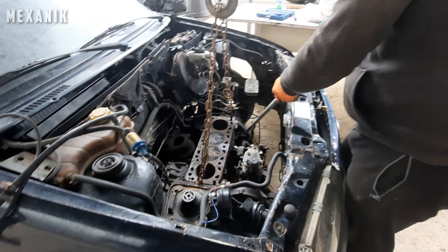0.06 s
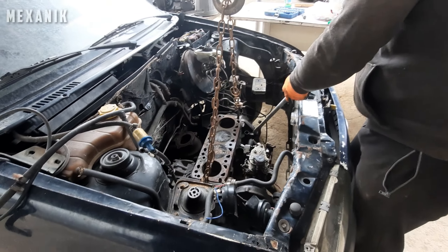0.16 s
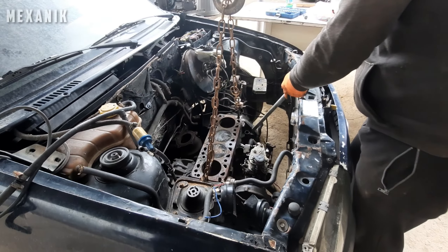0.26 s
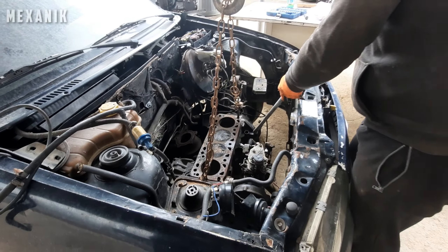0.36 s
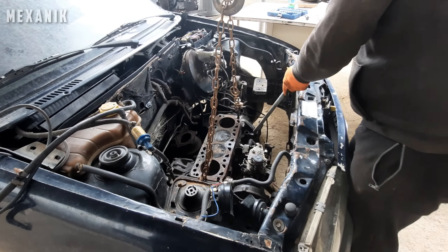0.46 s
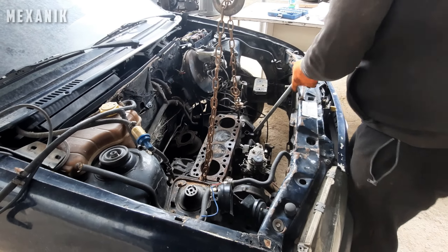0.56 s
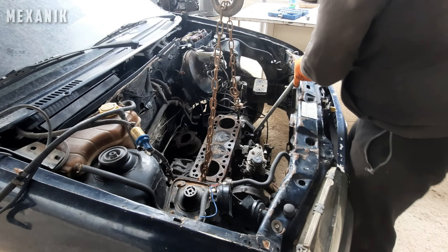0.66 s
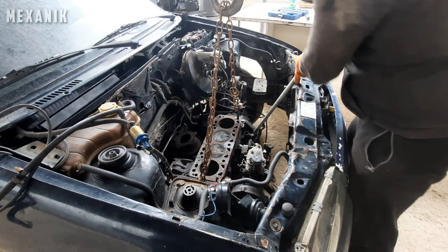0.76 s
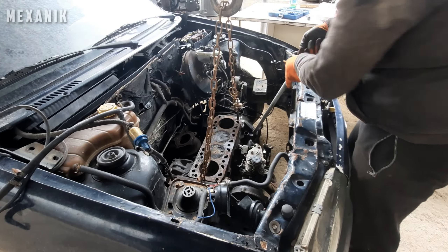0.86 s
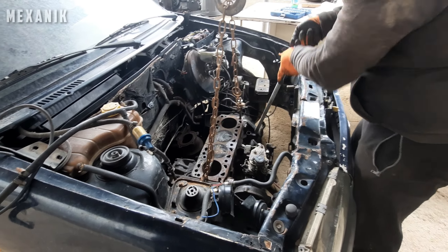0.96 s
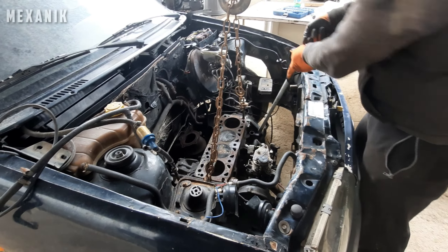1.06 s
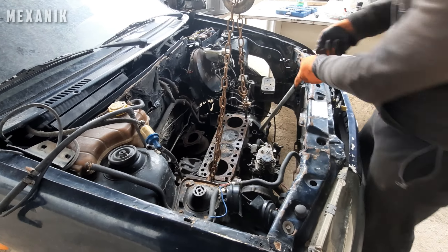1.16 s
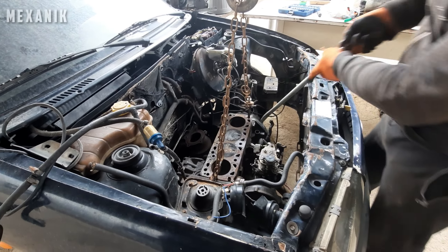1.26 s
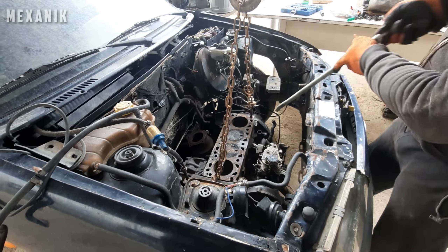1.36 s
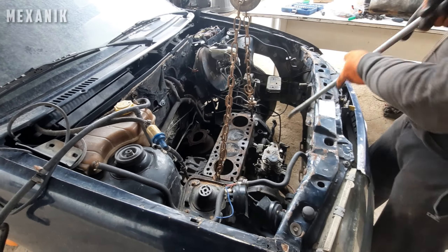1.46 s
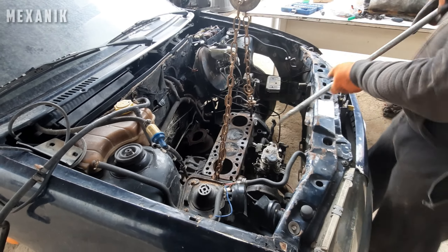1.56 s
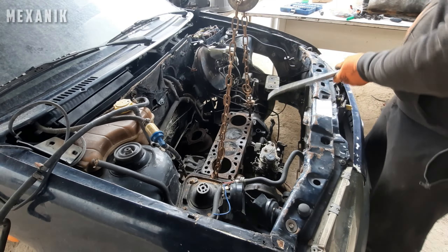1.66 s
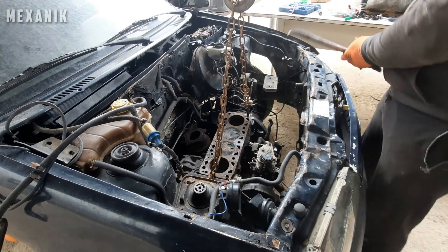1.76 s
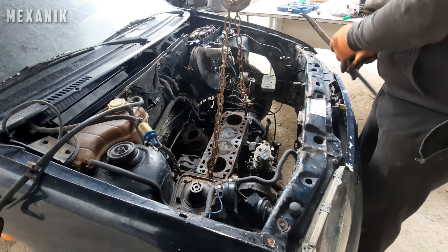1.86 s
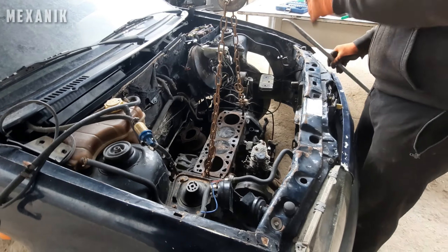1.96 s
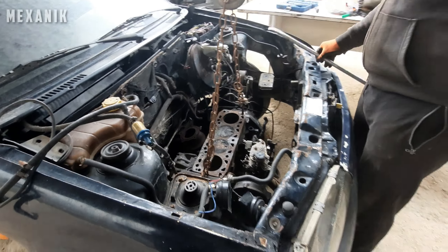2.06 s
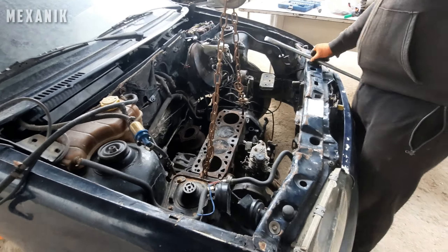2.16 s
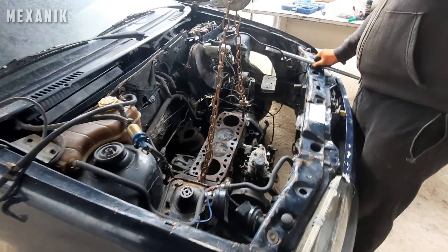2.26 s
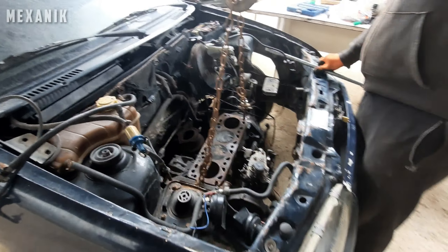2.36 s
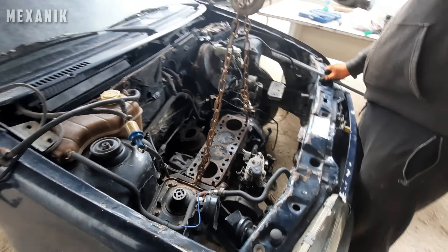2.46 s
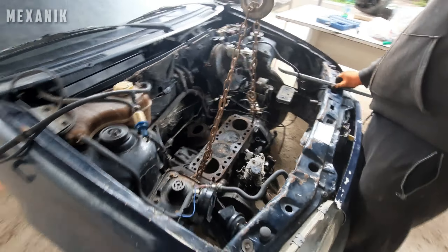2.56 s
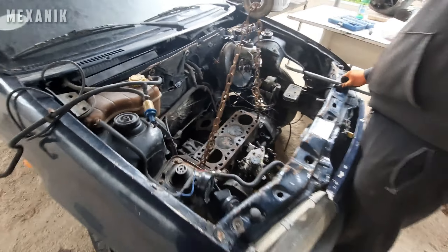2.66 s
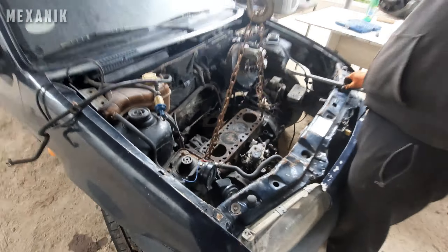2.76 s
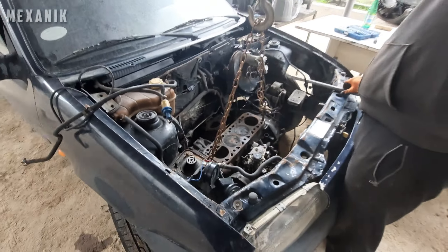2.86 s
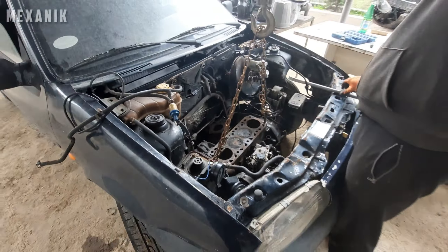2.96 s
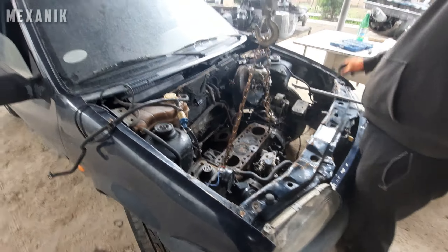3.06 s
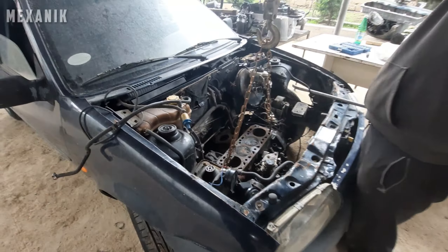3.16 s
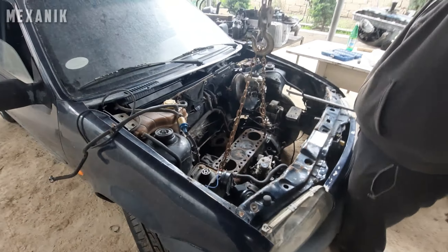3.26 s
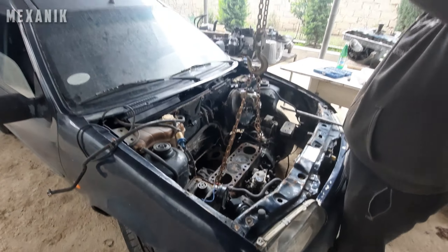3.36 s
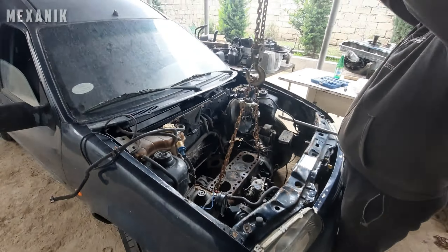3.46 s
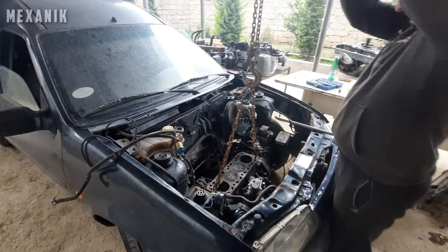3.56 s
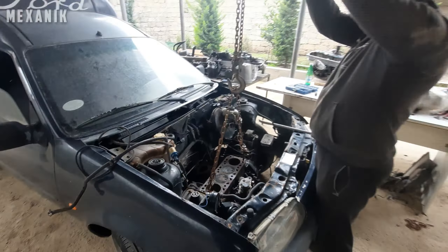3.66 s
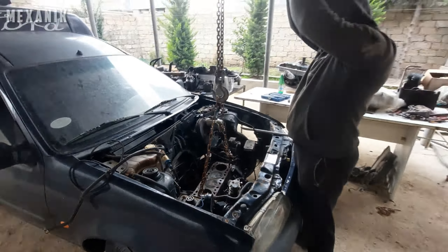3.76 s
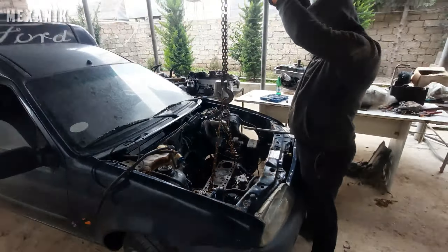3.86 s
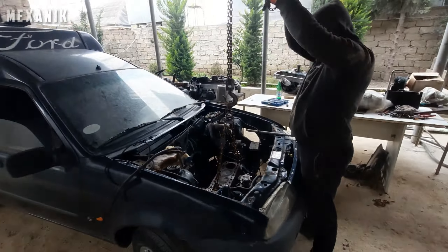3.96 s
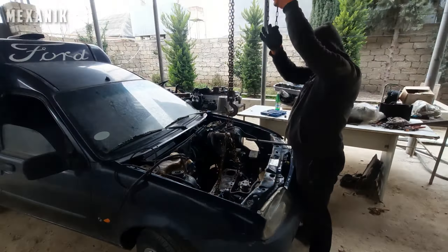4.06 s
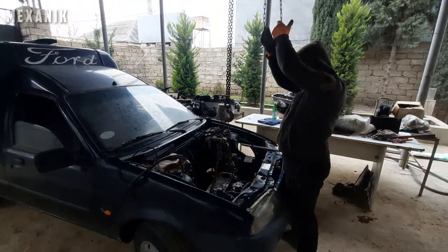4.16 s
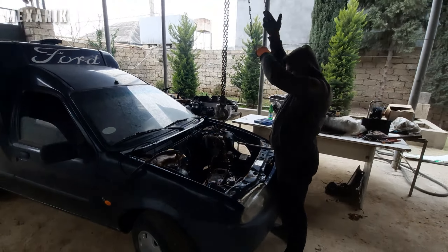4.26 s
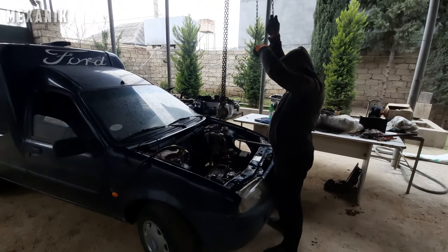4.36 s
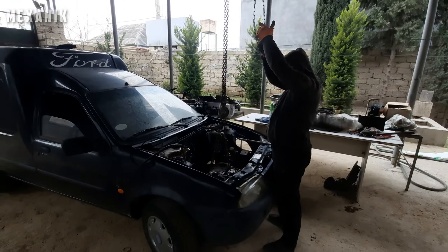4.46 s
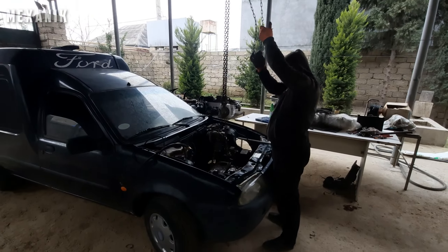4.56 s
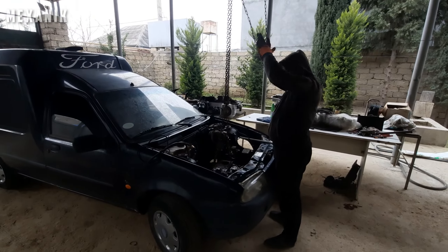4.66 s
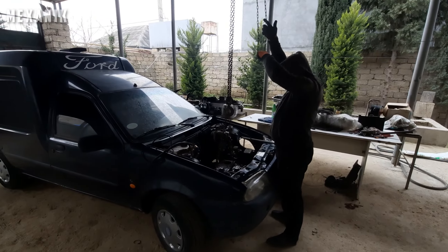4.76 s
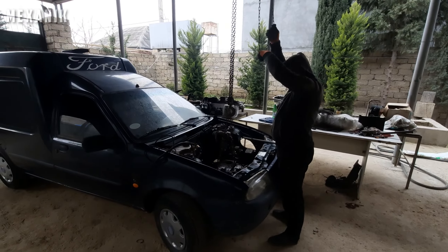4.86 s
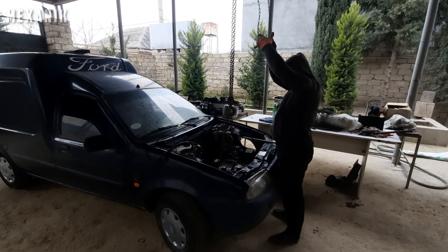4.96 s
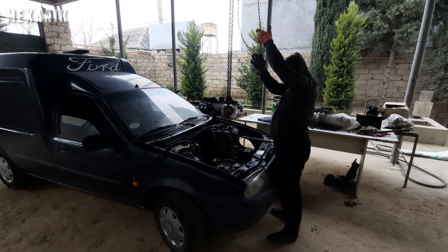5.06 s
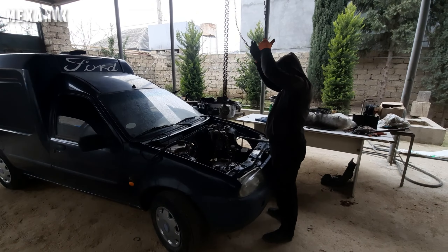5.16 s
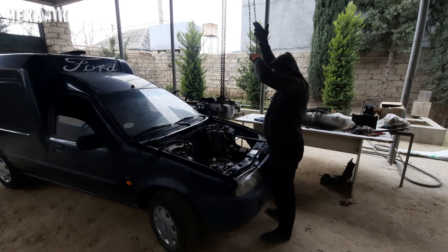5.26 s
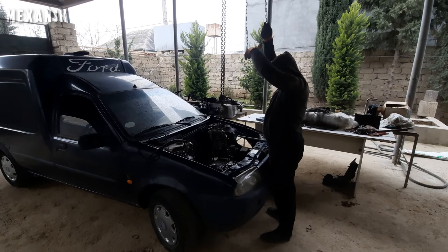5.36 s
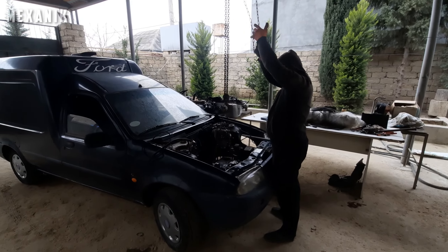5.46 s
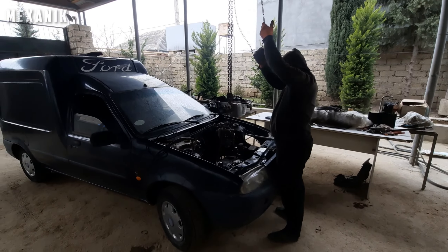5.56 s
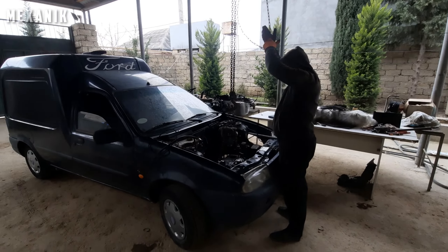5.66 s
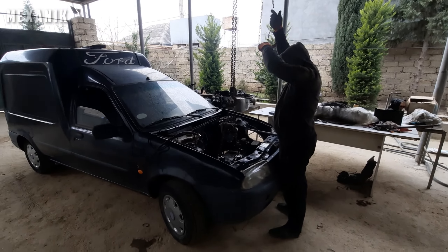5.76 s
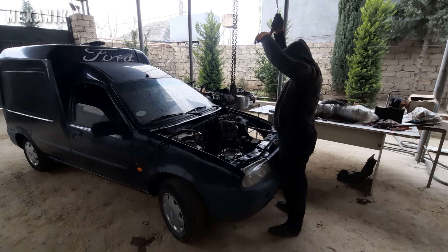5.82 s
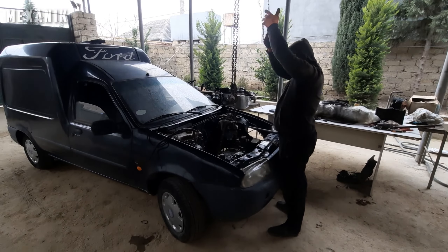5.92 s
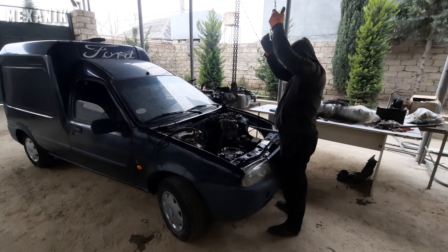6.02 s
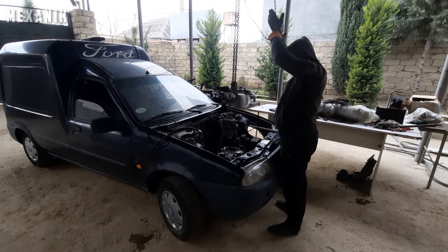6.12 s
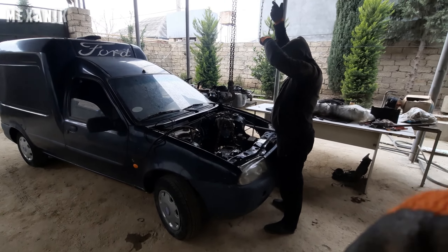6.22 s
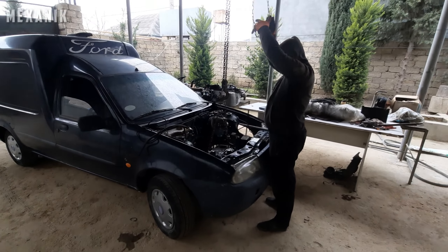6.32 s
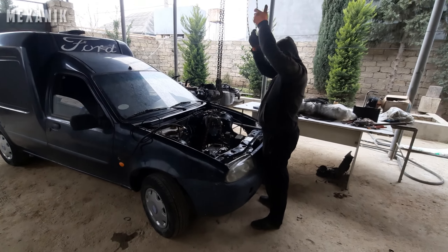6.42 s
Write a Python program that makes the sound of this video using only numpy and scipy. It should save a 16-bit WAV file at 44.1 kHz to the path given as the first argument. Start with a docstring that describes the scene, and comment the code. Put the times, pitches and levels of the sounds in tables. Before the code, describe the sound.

Close stereo sound in an open-sided shed, slightly stronger on the right, with short diffuse echoes. From 0 to 1.3 s a steel bar makes quiet, irregular taps and small tinkles on engine metal, gradually firmer and duller. At about 1.33 and 1.40 s two bright, hard catches start a gritty, singing scrape that fades by 1.6 s. A soft cloth-like swish passes near 1.85 s. From 2.04 s knocks return in a fast scrabble, loudest around 2.16, 2.46 and 2.68 s, dry and clanking, with hollow panel thuds and low boom continuing to about 3.2 s. From 3.0 s a chain hoist is hauled: rattling bursts every 0.2 to 0.3 s after 3.4 s, bright link clinks, wheel clatter, and a low pulsing roof-beam drone. A heavier low clank lands at 5.57 s. Pulling continues to the end, around 6.4 s, over faint air rumble.

```python
"""First a steel pry bar taps, scrapes and knocks, close by, in the engine bay of a van under an open shed roof.
Then a chain hoist is hauled hand over hand: links clink and rattle, and the roof beam that carries it drones.
Metal is made of damped sines, resonances struck by random contacts, and shaped noise; cloth and air are noise.
The microphone's right port is a little nearer to the work; the shed answers with short, diffuse echoes."""
import sys
import numpy as np
from scipy import signal
from scipy.fft import rfft, irfft, next_fast_len
from scipy.io import wavfile
from scipy.ndimage import map_coordinates

SR = 44100
rng = np.random.default_rng(int(sys.argv[2]) if len(sys.argv) > 2 else 0)


def master(y):
    """Save y as 16-bit WAV."""
    cut = np.clip(np.atleast_2d(y).T, -1, 1)
    pcm = np.round(cut * 32767)  # scale
    wavfile.write(sys.argv[1], SR, pcm.astype(np.int16))


def gain_from_db(level_db):
    """Turn a decibel level (scalar or array-like) into a linear amplitude factor."""
    decades = np.asarray(level_db, float) / 20
    return 10 ** decades


N = 286209
TIME = np.arange(N) / SR

# Steel blows in the engine bay, by the bar and later by the jerking chain. Each row: start in seconds,
# level in dB, strongest region in Hz, ring t60 in seconds, panel thud in dB, thud region in Hz.
BLOWS = [(0.04, -49, 2950, 0.049, -66.5, 650), (0.059, -54, 2570, 0.059, -71, 646),
         (.14, -62, 1400, 0.073, -74, 650), (0.239, -60, 2850, 0.033, -74, 283),
         (0.314, -45, 1840, 0.039, -65.5, 282), (0.484, -44.5, 2110, 0.058, -53.5, 560),
         (.51, -55, 1400, 0.1, -60.5, 556), (0.763, -40, 1390, 0.035, -47, 297),
         (0.88, -45, 815, 0.053, -46.5, 564), (0.933, -43, 2040, 0.043, -64, 540),
         (1.053, -36, 755, 0.034, -44.5, 332), (1.273, -39, 2100, 0.1, -59, 690),
         (1.33, -40, 3100, .1, -74, 573), (2.039, -53, 2500, 0.043, -56, 700),
         (2.0505, -32.5, 794, 0.035, -47.5, 800), (2.065, -36.5, 2750, 0.046, -48, 726),
         (2.077, -45, 3000, 0.023, -59, 740), (2.104, -44, 800, .03, -54, 740),
         (2.115, -49, 2800, .025, -55, 700), (2.1345, -34, 2200, 0.02, -46, 630),
         (2.149, -45, 2600, 0.042, -64, 690), (2.162, -22.5, 1620, 0.02, -54, 584),
         (2.1645, -25, 2680, 0.015, -55, 580), (2.18, -40, 3200, 0.013, -57, 573),
         (2.204, -49, 2620, 0.033, -60, 557), (2.362, -36.5, 721, 0.06, -51.5, 695),
         (2.4575, -17.5, 1650, 0.055, -36, 237), (2.463, -18.5, 1140, 0.048, -39, 640),
         (2.473, -32, 780, 0.061, -39.5, 640), (2.554, -47.5, 2700, 0.15, -49, 250),
         (2.584, -36, 1450, 0.057, -43, 660), (2.601, -25, 1170, 0.042, -39, 664),
         (2.6766, -21, 1300, 0.047, -47, 657), (2.682, -25, 1630, 0.03, -48, 657),
         (2.782, -34.5, 715, 0.037, -52.5, 280), (2.827, -51, 1680, .03, -59, 460),
         (2.8395, -30, 1200, 0.045, -53, 460), (2.845, -36, 1490, 0.029, -55, 460),
         (2.91, -40.5, 1500, 0.053, -51, 584), (2.973, -32.5, 1240, 0.067, -49, 212),
         (3.076, -32, 1500, 0.085, -34.5, 219), (3.1525, -33, 1250, 0.081, -50, 600),
         (3.366, -49, 2800, 0.074, -62, 600), (3.397, -37, 2600, 0.028, -56, 151),
         (3.4274, -46, 1820, 0.027, -63, 600), (3.447, -41, 2000, 0.12, -52, 204.5),
         (3.729, -36, 2600, 0.045, -54, 600), (4.085, -38.5, 744, 0.11, -36, 282),
         (5.567, -23.5, 720, 0.07, -28.5, 268), (5.585, -29.5, 740, 0.14, -39, 650),
         (5.625, -42, 746, 0.15, -34.5, 303)]
# Bar and struck metal. Each row: mode in Hz, relative level in dB, share of the blow's ring time (a ratio).
BAR_MODES = [(743, 4.5, 1.07), (850, -7, 0.14), (1138, 2, 1.26), (1427, -2, 1.6), (1562, -4.5, 0.92),
             (1750, 7, 0.63), (2090, 4, 0.76), (2400, -5, 0.44), (2690, -3.5, 0.96), (2904, 5.5, 0.78),
             (3270, 1, 0.57), (3680, -2, 1.2), (4210, 4.5, 0.71), (5230, -7, 0.87), (6500, 3.5, 0.3)]
# Panels of the van. Each row: mode in Hz, t60 in seconds for a blow that rings for PANEL_RING_S.
PANEL_MODES = [(190, 0.27), (220, 1), (270, 0.56), (300, 0.55), (355, 0.19), (415, 0.12), (500, 0.35),
               (570, 0.38), (640, 0.34), (690, 0.14), (750, 0.067)]
PANEL_RING_S = 0.074  # for other blows the panels ring in proportion
CLANK_DB, CLANK_DB_PER_OCTAVE = -7.5, 0.5  # clank against a 1 kHz blow; its rise with the blow's region
# Bright snaps of hard edge on hard edge. Each row: start in seconds, level in dB, t60 in seconds.
SNAPS = [(.0403, -60.5, .06), (.4035, -67, .06), (.484, -67, .04), (.7642, -65, .06), (0.854, -52, 0.041),
         (.933, -69, 0.027), (.9662, -61, 0.047), (1.0201, -66, .04), (1.274, -55, .06), (1.3292, -26, .03),
         (1.3978, -23.5, .03), (2.0615, -58, .05), (2.1475, -67, .04), (2.163, -65, .04),
         (2.4579, -40, 0.043), (2.584, -62, .04), (2.602, -58, .04), (2.6757, -51.5, 0.046),
         (2.9138, -57, .05)]
# The bar chattering over edges between its blows. Each row: time in seconds, level in dB.
CHATTER = [(2.02, -66), (2.06, -48.5), (2.12, -53.5), (2.17, -41.5), (2.23, -72), (2.44, -68), (2.47, -49),
           (2.56, -64), (2.61, -50), (2.67, -63), (2.69, -61), (2.76, -60), (2.9, -68), (2.93, -45),
           (2.99, -69)]
# Small tinkling taps on thin, light metal, then two hard catches of the scraping bar (the last two rows).
# Each row: start in seconds, level in dB, strongest region in Hz.
TINKLES = [(0.039, -59, 10000), (.113, -70, 2600), (0.12, -58, 4100), (0.139, -63.5, 6300),
           (.203, -61, 5870), (0.238, -61.5, 3500), (0.313, -70, 5900), (.404, -63, 5900),
           (0.469, -58, 4200), (0.483, -64, 6000), (1.247, -61, 8100), (1.329, -34, 8500),
           (1.398, -33.5, 10400)]
# The small tinkling metal. Each row: mode in Hz, relative level in dB, t60 in seconds.
TINKLE_MODES = [(2600, 7, 0.06), (4120, 0, 0.048), (5910, 5.5, .045), (6500, 0, 0.043), (8200, 2.5, .05),
                (8460, -4, 0.066), (9500, 0, 0.042), (10480, 2, 0.059), (12800, -6, .04)]
# The bar drawn along metal. Each row: time in seconds, relative level in dB.
SCRAPE_LEVEL = [(1.265, -63), (1.273, -44.5), (1.323, -51.5), (1.33, -36), (1.365, -38), (1.393, -43.5),
                (1.397, -36.5), (1.42, -40.5), (1.485, -44), (1.53, -55), (1.6, -76)]
# Steel singing under the scrape. Each row: mode in Hz, width in Hz, relative level in dB.
SINGING_MODES = [(575, 30, -1), (1893, 22, 6), (2592, 24, 5), (2893, 54, 1), (3640, 33, 4), (4140, 29, 0.5),
                 (5363, 12, 19), (5980, 20, 4), (6536, 16, 10), (7030, 20, 2), (7630, 25, 2), (8127, 20, 7),
                 (8504, 24, 2), (8840, 40, 0), (9830, 55, 1), (10480, 28, 5), (11660, 22, 3)]
# Hiss of grit under the bar. Each row: frequency in Hz, relative level in dB per Hz.
GRIT_SPECTRUM = [(240, -31), (400, -12.5), (569, -4.5), (958, -19), (2640, -7), (3320, -4.5), (5330, -8.5),
                 (15600, -12.5)]

# Hand-over-hand pulls. Each row: grip in seconds, time to full speed in seconds (at least 0.005 is used),
# time at full speed in seconds, then relative levels of link rattle, low and higher beam modes in dB.
PULLS = [(3.003, 0.085, 0.022, -34.5, -37, -37), (3.447, 0.081, 0.099, -36, -35, -37.5),
         (3.753, 0.0039, 0.12, -38, -36, -39), (3.976, .11, 0.028, -34, -34, -35.5),
         (4.203, 0.034, 0.085, -35, -39, -42), (4.438, 0.052, 0.11, -36, -32.5, -36.5),
         (4.658, 0.047, 0.038, -35.5, -33.5, -40), (4.844, 0.005, 0.0094, -41.5, -49.5, -49.5),
         (4.981, 0.096, 0.033, -34.5, -35, -39.5), (5.204, 0.069, 0.052, -36, -34, -37.5),
         (5.421, 0.1, 0.034, -35.5, -33, -36), (5.658, 0.05, 0.078, -34.5, -37.5, -36.5),
         (5.872, 0.11, 0.047, -37, -37, -34.5), (6.132, 0.034, 0.075, -35.5, -33, -34.5),
         (6.339, 0.036, 0.098, -36.5, -35, -35.5)]
START_DB, COAST_DB_PER_S = -8.5, 192  # links start at once below full level, and fade as the chain coasts
WHEEL_DB, WHEEL_START_DB, WHEEL_COAST_DB_PER_S = -5.5, -10, 137  # the wheel against the links
BEAM_LAG_S, BEAM_START_DB, BEAM_FADE_DB_PER_S = .03, -7, 87.5  # the roof answers late and fades slowly
UPPER_DB, SHEETING_DB, SHEETING_FADE_DB_PER_S = -3, -6, 46  # against the beam drone
FLUTTER_DB, FLUTTER_PER_S = 1.5, 70  # links arrive in uneven clumps
# Single loud links. Each row: start in seconds, then tick, high and low link modes in dB before a fixed offset.
CLINKS = [(3.0857, -33, -34, -46), (3.568, -38, -39, -31), (3.604, -28, -42, -31), (3.62, -35, -32.5, -55),
          (3.658, -32, -33.5, -57), (3.762, -37, -50, -35.5), (3.807, -40, -50, -52),
          (3.8938, -40, -48, -60), (4.0397, -38, -45, -37), (4.095, -33, -36.5, -42),
          (4.115, -38, -35.5, -48), (4.1328, -38, -50, -37), (4.23, -30.5, -43, -52.5),
          (4.2455, -36, -50, -33.5), (4.3014, -40, -53, -41), (4.445, -39, -49, -46.5),
          (4.5453, -38, -41, -43), (4.6, -25, -29, -41), (4.707, -37, -33, -59), (4.938, -20.5, -55, -52),
          (5.0083, -32, -47, -46), (5.0619, -35, -31, -53.5), (5.0923, -29, -31, -46),
          (5.1109, -36, -48, -36), (5.2806, -38, -40, -52), (5.444, -32, -53, -36), (5.5133, -30, -37, -40),
          (5.5401, -38, -40, -52), (5.565, -36, -36.5, -57), (5.689, -36, -43, -40),
          (5.7396, -36, -43, -35), (5.8743, -40, -40.5, -40), (5.9502, -29, -27, -57),
          (5.995, -38.5, -38, -35), (6.1367, -37, -48, -32.5), (6.161, -36, -43.5, -49),
          (6.1726, -34, -55, -38), (6.2016, -38.5, -50, -33.5), (6.2534, -40, -55, -50),
          (6.339, -36, -46, -36.5), (6.412, -26, -22, -47), (6.4575, -34.5, -42, -44)]
# Clink of each grip against the pull's rattle: one row of tick, high and low link modes in dB.
GRIP_DB = [-3, -12, -13]
# Link resonances, high and low. Each row: mode in Hz, width in Hz, relative level in dB.
LINK_HIGH_MODES = [(9250, 54, -9.5), (10125, 70, 4.5), (10213, 78, 7), (10224, 84, 0), (10590, 270, -7),
                   (12400, 36, -13.5)]
LINK_LOW_MODES = [(4654, 94, 3.5), (4785, 91, -0.5), (4900, 23, 8.5), (5050, 72, 1), (5280, 55, -7),
                  (6330, 93, -7), (8050, 74, -6.5)]
# Broad hiss of many small link contacts. Each row: frequency in Hz, relative level in dB per Hz.
RATTLE_SPECTRUM = [(1470, -28), (2500, -4), (3240, -3), (4130, -9), (4830, -2), (5720, -6.5), (6270, -6.5),
                   (7590, -10), (10400, -6), (15600, -7)]
# Hand wheel and housing. Each row: mode in Hz, width in Hz, relative level in dB.
WHEEL_MODES = [(1240, 67, -13), (1463, 22, 15), (1710, 80, -23), (2108, 58, 9), (2816, 26, 9),
               (3250, 410, 6)]
# Broad clatter of the wheel. Each row: frequency in Hz, relative level in dB per Hz.
CLATTER_SPECTRUM = [(410, -16.5), (700, -10), (1170, -15), (1530, -12.5), (3240, -18.5), (4000, -25),
                    (5200, -62), (8800, -120)]
# Knocks of the hoist's ratchet pawl in the wheel housing. Each row: start in seconds, relative level in dB.
KNOCKS = [(3.5795, -35), (3.7595, -34), (3.785, -40.5), (4.243, -34), (4.47, -37), (4.6954, -49),
          (4.7473, -34.5), (4.8486, -36), (5.257, -38.5), (5.4241, -41), (5.4955, -40), (5.6865, -38.5),
          (5.871, -37.5), (6.133, -37), (6.1652, -33), (6.3352, -29)]
# What a knock on the wheel rings. Each row: mode in Hz, width in Hz, relative level in dB.
HOUSING_MODES = [(1545, 130, 18), (1810, 180, 7.5), (2100, 86, 11), (1880, 1400, 6.5)]
# Roof beam, two lowest modes and then three more. Each row: mode in Hz, width in Hz, level within its group in dB.
BEAM_MODES = [(192.4, 26.5, -11.5), (229.3, 15.3, 3), (263.4, 14.5, 3.5), (297, 31, -13), (339.7, 21.5, -8)]
# Upper beam modes. Each row: mode in Hz, width in Hz, relative level in dB.
BEAM_UPPER_MODES = [(420, 60, -4), (517, 26.3, 5.5), (594.5, 25.3, 0), (660, 20, -5.5), (730, 33, -18.5)]
# Roof sheeting. Each row: mode in Hz, width in Hz, relative level in dB.
SHEETING_MODES = [(120, 18.7, -7), (140, 36.3, 0.5), (154.8, 65.6, -3)]
RECEDE_DB_PER_S = 3.5  # the sheeting rumble thins as the microphone backs away
BEAM_SHIFT_DB_PER_S = 1  # as the microphone moves, the two lowest beam modes lose this, the next three gain it

# Low panel boom around the blows, with shuffling and rubbing in the middle range.
# Each row: time in seconds, bass level in dB, middle level in dB.
SHUFFLE_LEVEL = [(0.0, -71.5, -71.5), (0.34, -77.5, -73.5), (0.81, -62.5, -62), (0.95, -58, -65),
                 (1.27, -59.5, -61), (1.38, -62, -51.5), (1.55, -70.5, -67.5), (1.86, -69.5, -65.5),
                 (2.11, -68, -67.5), (2.25, -63, -69.5), (2.44, -57, -55.5), (2.56, -47.5, -58),
                 (2.63, -43.5, -63), (2.88, -53, -62.5), (3.05, -50, -60), (3.18, -41, -50.5),
                 (3.3, -57, -69), (3.45, -63, -57)]
# Colours of the boom, the shuffling and the hush. Each row: frequency in Hz, relative level in dB per Hz.
LOW_SPECTRUM = [(24, -65), (40, -47), (113, -2), (196, -5.5), (355, -9.5), (531, -19.5), (560, -3.5),
                (1000, -28.5), (1300, -33), (2200, -120)]
MIDDLE_SPECTRUM = [(470, -14), (800, -0.5), (1040, -2.5), (1330, -1.5), (3880, -11), (5000, -21),
                   (6500, -32), (11000, -120)]
HISS_SPECTRUM = [(2350, -26), (4000, 0.5), (5230, -3.5), (9720, -8.5), (14700, -6), (15400, 1.5)]
# Airy swishes, probably cloth. Each row: middle in seconds, half length in seconds, level in dB,
# top treble against the rest in dB.
SWISHES = [(0.057, 0.077, -65, 2), (0.446, 0.039, -76, 2), (0.67, 0.13, -71.5, 1.5),
           (0.774, .02, -63.5, .5), (1.006, 0.069, -75, .5), (1.195, 0.066, -74, 1),
           (1.846, 0.061, -58.5, 0.5), (2.078, 0.06, -59, -8.5), (2.449, 0.086, -47.5, -11),
           (2.596, .05, -67, -5), (2.94, 0.032, -53.5, -7), (3.402, 0.056, -59.5, -0.5)]
TOP_TREBLE_HZ = 9500
HUSH_DB, SWISH_EDGE_DB = -80.5, 14.5  # treble between swishes; how far a swish has sunk at its half length
# Air on the microphone ports. Each row: time in seconds, level in dB.
AIR_LEVEL = [(0.0, -99), (0.05, -109), (1.37, -71), (1.76, -110), (2.55, -78), (3.49, -81), (3.78, -80),
             (4.15, -71), (6.4, -67)]
# Colour of that air. Each row: frequency in Hz, relative level in dB per Hz.
BREEZE_SPECTRUM = [(15, -6), (30, -17), (60, 12), (110, 12), (200, -46), (400, -120)]
# Decay of the shed's echoes. Each row: frequency in Hz, t60 in seconds.
SHED_T60 = [(200, 0.12), (1000, 0.36), (4000, 0.15), (12000, 0.24)]
# Strength of the echoes. Each row: frequency in Hz, echo level in dB.
ECHO_LEVEL = [(200, -13), (600, -11), (1500, -3), (5000, -2), (14000, 0)]
# Left port against right. Each row: frequency in Hz, level difference in dB.
LEFT_LEVEL = [(100, 0), (300, -1.5), (1000, -2.5), (2000, -1), (4500, -3), (8000, -3.5), (13000, -1.5)]
LEFT_LAG_S = 4 / SR


def pry_bar():
    """Each blow rings the modes near its strongest region, clanks broadly, thuds in the panels; hard edges snap."""
    out, t = np.zeros((2, N + SR)), np.arange(6400) / SR
    bar_hz, bar_db, share = np.transpose(BAR_MODES)[..., None]
    panel_hz, panel_t60 = np.transpose(PANEL_MODES)[..., None]
    for s, db, hz, t60, thud_db, thud_hz in BLOWS:
        contact = 3 / hz  # a duller blow is a softer, longer contact
        bar_level = db + bar_db - 7 - 14 * np.abs(np.log2(bar_hz / hz))
        ring = ringing(bar_hz, t60 * share, bar_level, t, attack=contact, vary_db=2.5)
        # a hard snap, then a slower tail
        dying = gain_from_db(8.0 - 60 * t / (0.27 * t60)) + gain_from_db(-7.5 - 60 * t / (1.26 * t60))
        clank = gain_from_db(db + CLANK_DB + CLANK_DB_PER_OCTAVE * np.log2(hz / 1e3)) * dying
        clank = clank * (1 - np.exp(-t / contact)) * body(hz, low_db=10.0, high_db=13.0, size=len(t))
        panel_level = thud_db - 0.5 - 22 * np.abs(np.log2(panel_hz / thud_hz))
        panel_ring_s = panel_t60 * t60 / PANEL_RING_S
        thud = ringing(panel_hz, panel_ring_s, panel_level, t, attack=0.0089, vary_db=3.5)
        boom = gain_from_db(thud_db - 1.5 - 60 * t / 0.32) * (1 - np.exp(-t / 0.0014))
        boom = boom * body(thud_hz, low_db=24.5, high_db=12.0, size=len(t))[0]
        out[:, round(s * SR):][:, :len(t)] += ring + clank + thud + boom
    for s, db, t60 in SNAPS:
        snap = gain_from_db(db - 60 * t / t60) * body(11500, low_db=2.5, high_db=-0.5, size=len(t))
        out[:, round(s * SR):][:, :len(t)] += snap
    chatter, = gains(CHATTER)
    return out[:, :N] + jingle(chatter, 260, low_hz=1320, high_hz=4390, cycles=35)


def tinkles():
    """Each tap or catch rings the small light metal near its strongest region, with a tiny click."""
    out, t = np.zeros(N + SR), np.arange(6400) / SR
    hz, mode_db, t60 = np.transpose(TINKLE_MODES)[..., None]
    for s, db, best_hz in TINKLES:
        octaves = np.log2(hz / best_hz)
        level_db = db + mode_db - np.maximum(24 * octaves, -5 * octaves)  # steeper above than below
        ring = ringing(hz, t60, level_db, t, attack=0.0014, vary_db=4)
        click = gain_from_db(db - 0.5 - 60 * t / 0.028) * body(best_hz, low_db=7, high_db=14, size=len(t))[0]
        out[round(s * SR):][:len(t)] += ring + click
    return out[:N]


def scrape():
    """Grit under the sliding bar hisses, and the steel sings on after each catch."""
    stroke, = gains(SCRAPE_LEVEL)
    catches = stroke * unit(contacts(2500, spread_db=1.5, alike=0.85))
    sing = filtered(catches, modes(SINGING_MODES))
    pings = jingle(stroke, 900, low_hz=1820, high_hz=15150, cycles=220)
    grit = stroke * coloured(contacts(1200, spread_db=3.5, alike=0.75), GRIT_SPECTRUM)
    return gain_from_db(9.5) * sing + gain_from_db(-2.0) * pings + gain_from_db(-2.0) * grit


def chain():
    """The pulls drive running links and the hand wheel, on fluttering levels, and shake the roof."""
    rattle = flutter() * pulled(START_DB, COAST_DB_PER_S, lag_s=0, column=3)
    clatter = gain_from_db(WHEEL_DB) * flutter() * pulled(WHEEL_START_DB, WHEEL_COAST_DB_PER_S, lag_s=0, column=3)
    return running_links(rattle, clatter) + hand_wheel(clatter) + roof() + clinks()


def running_links(rattle, clatter):
    """A dense rattle of small contacts that rings the link modes, with a crowd of separate pings."""
    hiss = coloured(contacts(1100, spread_db=3.0, alike=0.42), RATTLE_SPECTRUM)
    high = unit(filtered(contacts(200, spread_db=4.5, alike=0.091), modes(LINK_HIGH_MODES)))
    low = unit(filtered(contacts(150, spread_db=7.5, alike=0.49), modes(LINK_LOW_MODES)))
    links = rattle * (gain_from_db(-2.5) * hiss + gain_from_db(-13.0) * high + gain_from_db(-14.5) * low)
    links += gain_from_db(-9.0) * jingle(rattle, 850, low_hz=3007, high_hz=15060, cycles=530)
    return links + gain_from_db(-4.0) * jingle(clatter, 400, low_hz=890, high_hz=3520, cycles=21)


def clinks():
    """Loud links, and one at each grip: a bright tick and noise bursts that excite high and low link modes."""
    touches, t = np.zeros((3, 2, N + SR)), np.arange(200) / SR
    grips = [(s, *np.add(GRIP_DB, rattle_db)) for s, _, _, rattle_db, *_ in PULLS]
    for s, *levels_db in CLINKS + grips:
        # one short noise burst each for tick, high and low modes, starting together, partly alike at both ports
        shared, own = rng.standard_normal((3, 1, len(t))), rng.standard_normal((3, 2, len(t)))
        touch = unit(gain_from_db(-60 * t / 0.022) * (shared + 0.62 * own))
        touches[..., round(s * SR):][..., :len(t)] += gain_from_db(np.add(levels_db, [-15, 17, 17]))[:, None, None] * touch
    tick, high, low = touches[..., :N]
    tick = filtered(tick, lambda hz: gain_from_db(along(RATTLE_SPECTRUM, hz)))
    return tick + filtered(high, modes(LINK_HIGH_MODES)) + filtered(low, modes(LINK_LOW_MODES))


def hand_wheel(clatter):
    """Running links shake the wheel's modes and clatter broadly; single knocks ring its housing."""
    ring = unit(filtered(contacts(300, spread_db=2.0, alike=0.76), modes(WHEEL_MODES)))
    broad = coloured(contacts(700, spread_db=3.0, alike=1.0), CLATTER_SPECTRUM)
    wheel = clatter * (gain_from_db(-8.5) * ring + gain_from_db(-5.5) * broad)
    knocks, t = np.zeros(N + SR), np.arange(800) / SR
    for s, db in KNOCKS:
        knocks[round(s * SR):][:len(t)] += gain_from_db(db - 60 * t / 0.04) * rng.standard_normal(len(t))
    return wheel + filtered(knocks[:N], modes(HOUSING_MODES))


def roof():
    """The chain's jolts shake the sheeting and the beam, which drone late and fade slowly after each pull."""
    drone = pulled(BEAM_START_DB, BEAM_FADE_DB_PER_S, BEAM_LAG_S, column=4)
    upper = pulled(BEAM_START_DB, BEAM_FADE_DB_PER_S, BEAM_LAG_S, column=5)
    deep = pulled(BEAM_START_DB, SHEETING_FADE_DB_PER_S, BEAM_LAG_S, column=4)
    deep = deep * gain_from_db(-RECEDE_DB_PER_S * (TIME - PULLS[0][0]))
    shift = gain_from_db(BEAM_SHIFT_DB_PER_S * (TIME - 4.8))
    shaking = contacts(700, spread_db=0.5, alike=1.0)

    def shaken(table, edge_hz):
        """Resonances with little radiated below edge_hz, rms 1."""
        steep = lambda hz: (hz / edge_hz) ** 2 / (1 + (hz / edge_hz) ** 2)
        return unit(filtered(shaking, lambda hz: steep(hz) * modes(table)(hz)))

    out = deep * gain_from_db(SHEETING_DB) * shaken(SHEETING_MODES, edge_hz=56)
    out += drone / shift * shaken(BEAM_MODES[:2], edge_hz=32)
    out += gain_from_db(-1.0) * np.sqrt(upper * drone) * shift * shaken(BEAM_MODES[2:], edge_hz=71)
    return out + upper * flutter() * gain_from_db(UPPER_DB) * shaken(BEAM_UPPER_MODES, edge_hz=71)


def pulled(start_db, fade_db_per_s, lag_s, column):
    """Gain per sample of a layer driven by the pulls: a jump at the grip, a rise, a hold, then a steady fade."""
    power = np.zeros(N)
    for row in PULLS:
        since = TIME - row[0] - lag_s
        rise, hold = max(row[1], .005), row[2]
        rise_db = start_db * np.clip(1 - since / rise, 0, 1)
        fade_db = fade_db_per_s * np.maximum(since - rise - hold, 0)
        power += (since > 0) * gain_from_db(row[column] + rise_db - fade_db) ** 2
    return np.sqrt(power)


def flutter():
    """A fast random gain around 1, smooth between its knots."""
    knots = rng.standard_normal(int(N / SR * FLUTTER_PER_S) + 2)
    return gain_from_db(FLUTTER_DB * map_coordinates(knots, [TIME * FLUTTER_PER_S]) - 0.5)


def shuffle():
    """Grainy noises: low panel boom around the blows, shuffling and rubbing in the middle, hush and swishes on top."""
    low, middle = gains(SHUFFLE_LEVEL)
    hiss = np.full(N, gain_from_db(HUSH_DB))
    top = hiss.copy()
    for s, half, db, top_db in SWISHES:
        swell = gain_from_db(db - SWISH_EDGE_DB * ((TIME - s) / half) ** 2)
        hiss += swell
        top += gain_from_db(top_db) * swell
    cloth = coloured(contacts(5000, spread_db=1.5, alike=0.35), HISS_SPECTRUM)
    below = filtered(cloth, lambda hz: 1 / (1 + (hz / TOP_TREBLE_HZ) ** 12))
    low = low * coloured(contacts(5000, spread_db=2.0, alike=0.94), LOW_SPECTRUM)
    middle = middle * coloured(contacts(4000, spread_db=1.5, alike=0.39), MIDDLE_SPECTRUM)
    return low + middle + hiss * below + top * (cloth - below)


def breeze():
    """Air on the ports: a faint rumble, partly different at each, that comes and goes and is strongest at the end."""
    level, = gains(AIR_LEVEL, hold_last=True)
    return level * coloured(contacts(20000, spread_db=9.0, alike=0.65), BREEZE_SPECTRUM)


def shed(x, block=12288):
    """Echoes off roof, van and ground: decaying noise, drawn afresh for each overlapping block."""
    out, fade = np.zeros((2, N + SR)), signal.windows.hann(2 * block, sym=False)
    padded = np.pad(x, (block, 2 * block))
    for start in range(0, N + block, block):
        hz, t, z = signal.stft(rng.standard_normal((2, SR // 4)), SR, nperseg=256)
        t60 = along(SHED_T60, hz)[:, None]
        gain = gain_from_db(along(ECHO_LEVEL, hz)[:, None] - 60 * t / t60)
        gain = gain / np.sqrt(t60 * SR / (2 * np.log(1000)))  # same energy for any decay
        tail = signal.istft(z * gain, SR, nperseg=256)[1]
        wet = signal.fftconvolve((padded[start:start + 2 * block] * fade)[None], tail, axes=1)
        out[:, start:start + wet.shape[1]] += wet[:, :out.shape[1] - start]
    return out[:, block - 150:block - 150 + N]  # echoes begin 150 samples late


def ringing(hz, t60, level_db, t, attack, vary_db):
    """Damped sines at given levels, a little different at every blow."""
    luck = rng.standard_normal((3, len(hz), 1))
    tone = np.sin(2 * np.pi * hz * (1 + 0.004 * luck[0]) * t + np.pi * luck[2])
    level_db = level_db + vary_db * luck[1]
    return (gain_from_db(level_db - 60 * t / t60) * tone).sum(0) * (1 - np.exp(-(t / attack) ** 2))


def body(hz, low_db, high_db, size):
    """Noise for the crowd of unresolved modes, falling off (dB per octave) below and above hz."""
    octaves = np.log2(np.fft.rfftfreq(size, 1 / SR) / hz + 1e-3)
    slope = np.where(octaves < 0, low_db * octaves, -high_db * octaves)
    return unit(irfft(rfft(rng.standard_normal((2, size))) * gain_from_db(slope), size))


def jingle(level, per_second, low_hz, high_hz, cycles):
    """Many brief pings, each at its own pitch and place, fading at 60 dB per given cycles, cut off after 320 samples."""
    where = np.flatnonzero((rng.random(N) < per_second / SR) & (level > 1e-4))
    luck = rng.random((len(where), 4))
    hz, t = low_hz * (high_hz / low_hz) ** luck[:, :1], np.arange(320) / SR
    size_db = -4 * np.log(luck[:, 1:2] + 0.12)
    ping = gain_from_db(size_db - 60 * t * hz / cycles) * np.sin(2 * np.pi * hz * t)
    ping *= level[where, None] / np.sqrt(np.sum(ping ** 2) * per_second / SR / len(where))
    index = (where[:, None] + np.arange(len(t))).ravel()
    sides = []
    for k in (2, 3):  # a random gain and sign at each port
        heard = ping * np.cos(2 * np.pi * luck[:, k:k + 1])
        sides.append(np.bincount(index, heard.ravel(), N + len(t)))
    return np.array(sides)[:, :N]


def contacts(per_second, spread_db, alike):
    """Random tiny impacts of unequal size, spread along the object so that each port hears its own mixture."""
    where = np.flatnonzero(rng.random(N) < per_second / SR)
    size = gain_from_db(spread_db * np.minimum(rng.exponential(size=len(where)), 3.5))
    shared, *own = rng.standard_normal((3, len(where)))
    out = np.zeros((2, N))
    out[:, where] = size * (np.sqrt(alike) * shared + np.sqrt(1 - alike) * np.array(own))
    return out


def modes(table):
    """Causal response of a set of resonances, with alternating signs."""
    def response(f):
        total = 0
        for k, (centre, width, db) in enumerate(table):
            damping = 1j * f * width
            total = total + (-1) ** k * gain_from_db(db) * damping / (centre * centre - f * f + damping)
        return total
    return response


def filtered(x, response):
    """x times a complex response of frequency."""
    m = next_fast_len(N + 8192)
    return irfft(rfft(x, m) * response(np.fft.rfftfreq(m, 1 / SR)), m)[..., :N]


def coloured(x, spectrum):
    """x shaped by a spectrum, rms 1."""
    return unit(filtered(x, lambda hz: gain_from_db(along(spectrum, hz))))


def gains(rows, hold_last=False):
    """One gain per sample for each dB column; -120 dB outside the table unless its last level is held."""
    s, *columns = np.transpose(rows)
    return [gain_from_db(np.interp(TIME, s, c, left=-120, right=c[-1] if hold_last else -120)) for c in columns]


def along(points, hz):
    """(Hz, value) points on a log axis."""
    f, v = np.transpose(points)
    return np.interp(np.log(hz + 1), np.log(f + 1), v)


def unit(x):
    """Scaled to rms 1."""
    return x / np.sqrt(np.mean(x ** 2) + 1e-20)


def scene():
    """The sound reaches the right port first and mostly stronger; the echoes differ on each side."""
    dry = pry_bar() + tinkles() + scrape() + chain() + shuffle()
    side = np.array([[1], [-1]]) / 2  # left, right
    late = lambda hz: np.exp(-2j * np.pi * hz * LEFT_LAG_S * (side + .5))
    balance = lambda hz: gain_from_db(side * along(LEFT_LEVEL, hz) + 0.5)
    band = lambda hz: 1j * hz / (70 + 1j * hz) * (hz < 15750)  # bass falls below 70 Hz
    return filtered(dry + shed(dry[1]), lambda hz: late(hz) * balance(hz) * band(hz)) + breeze()


def low_pass(x):
    """Removes everything above the highest recorded frequency."""
    return signal.sosfilt(signal.butter(12, 16650, fs=SR, output="sos"), x)


def record(dry):
    """The finished mix of both microphone ports."""
    return low_pass(dry)


dry = scene()
out = record(dry)
master(out)
```